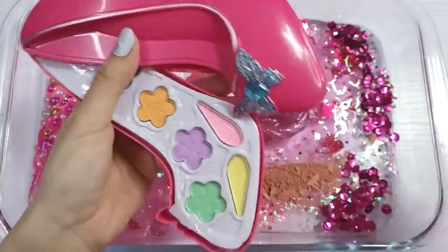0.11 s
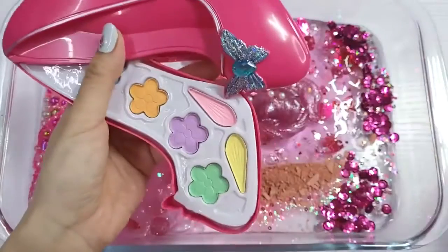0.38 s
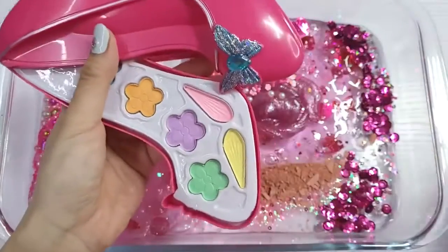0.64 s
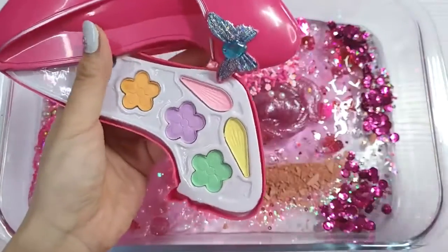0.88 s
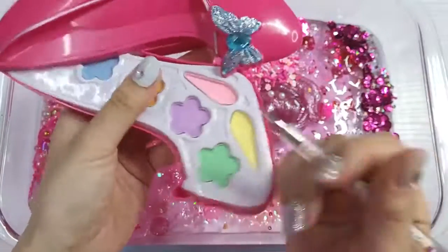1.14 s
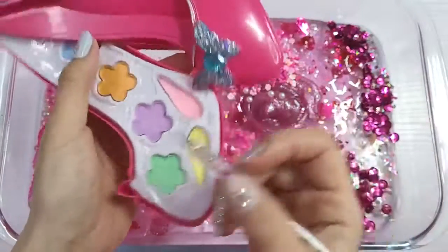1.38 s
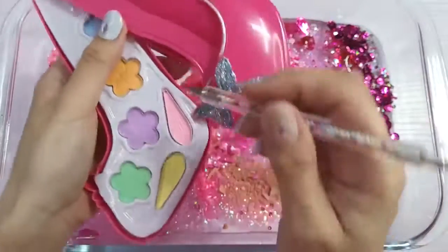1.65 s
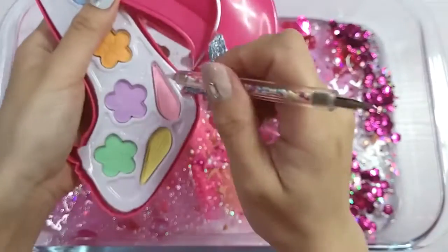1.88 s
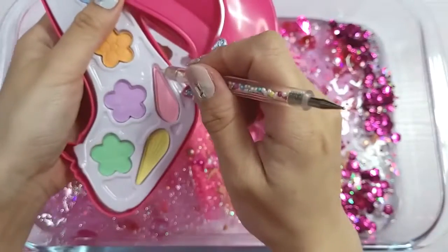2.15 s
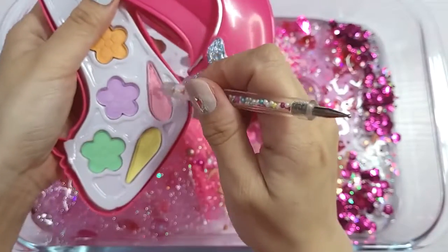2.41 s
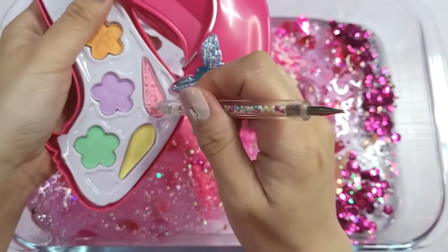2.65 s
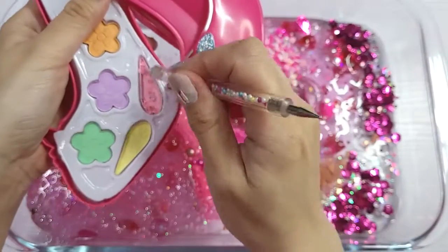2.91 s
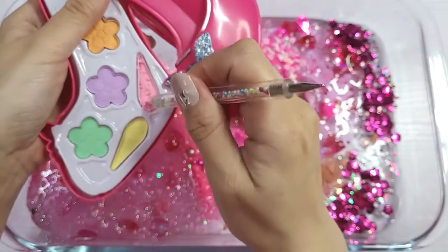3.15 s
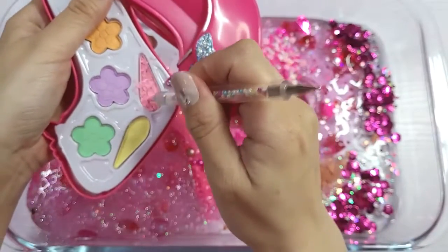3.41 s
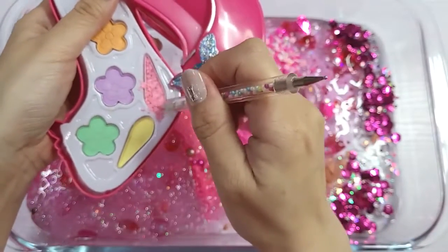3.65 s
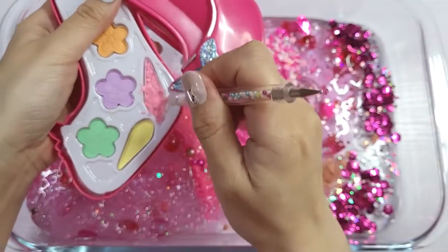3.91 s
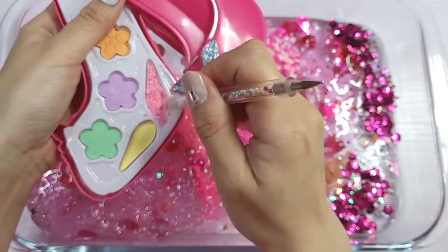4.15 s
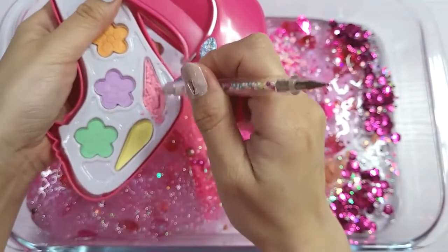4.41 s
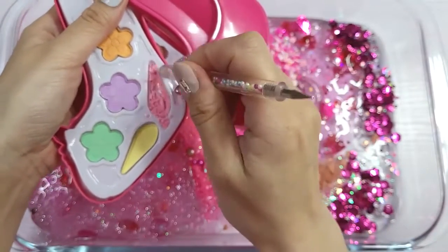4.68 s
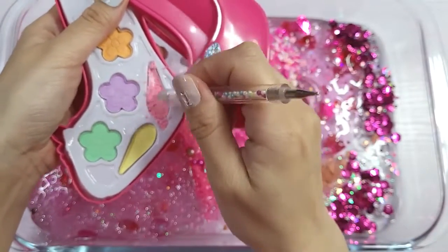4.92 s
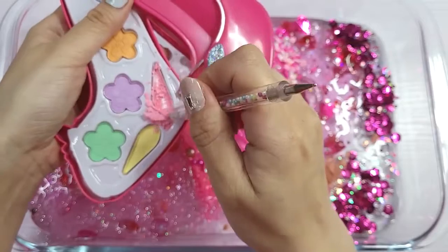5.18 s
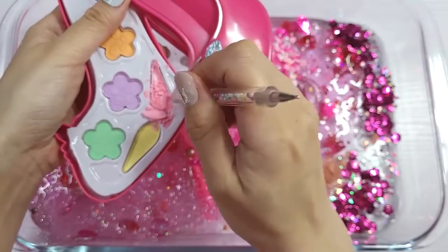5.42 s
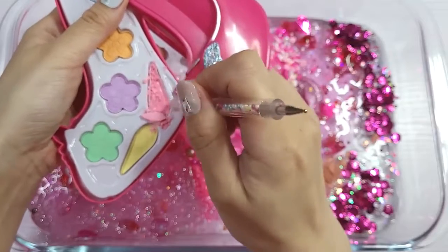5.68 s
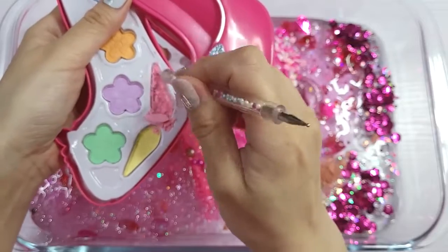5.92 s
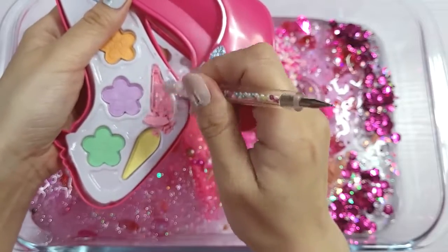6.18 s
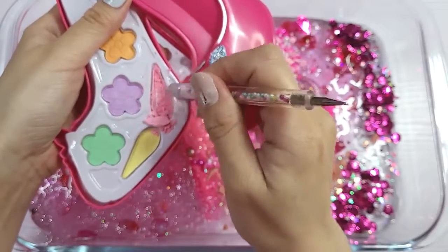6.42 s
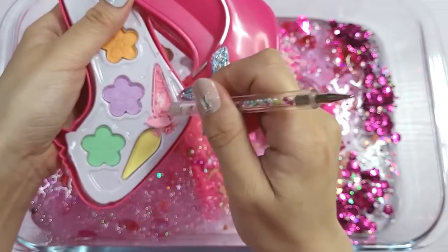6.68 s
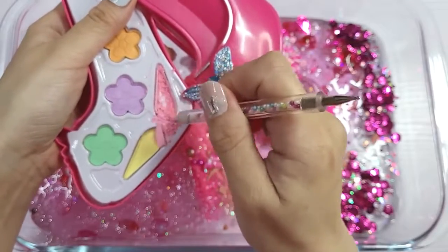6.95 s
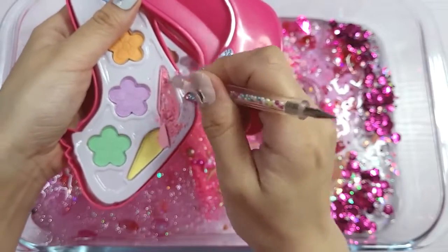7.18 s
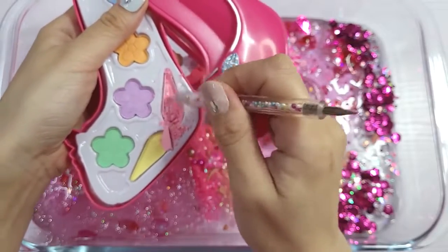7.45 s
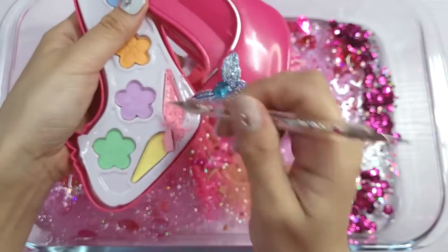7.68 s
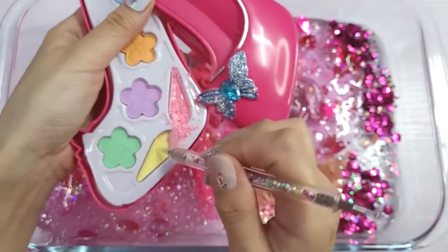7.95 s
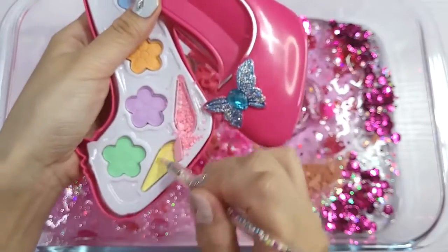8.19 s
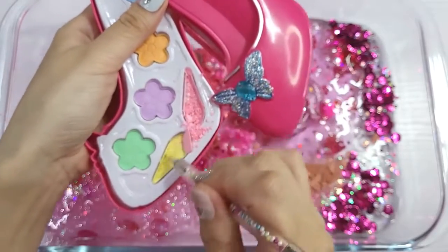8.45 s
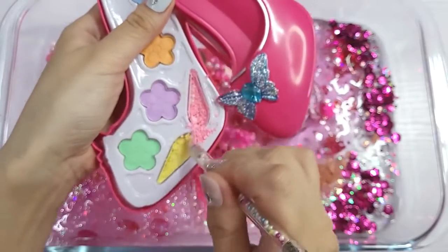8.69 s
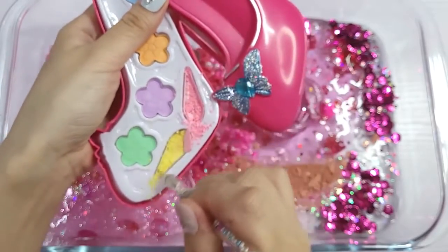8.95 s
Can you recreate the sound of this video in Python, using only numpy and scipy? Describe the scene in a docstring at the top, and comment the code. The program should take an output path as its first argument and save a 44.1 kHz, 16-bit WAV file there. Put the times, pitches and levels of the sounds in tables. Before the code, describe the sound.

Close crisp scraping and snapping on a thin plastic makeup palette, short uneven strokes with a few loud cracks over faint room hiss

```python
"""Scraping pressed powder from a plastic tray

A steel pick scrapes a hand-held tray, close to a stereo microphone, in a small room with quiet hum and hiss.
The tip sticks and slips: dense random slips and single snaps push the decaying modes of the hollow shell.
Breaking powder grains add puffs of treble noise; a faint wavering tone squeaks and soft noise bumps knock.
Random-sign echoes of the tray follow from the room."""
import sys
import numpy as np
from scipy import signal
from scipy.fft import rfft, irfft
from scipy.io import wavfile
from scipy.ndimage import uniform_filter1d

SR = 44100
rng = np.random.default_rng(int(sys.argv[2]) if len(sys.argv) > 2 else 0)


def store_wav(level_fs):
    """Save 16-bit WAV to argv[1]."""
    pcm = np.round(np.clip(np.atleast_2d(level_fs), -1, 1) * 32767)
    wavfile.write(sys.argv[1], SR, pcm.T.astype(np.int16))


def boost(x):
    """Linear amplitude factor 10**(x/20) for a level x in decibels (scalar or array-like)."""
    u = np.asarray(x, float) / 20
    return 10 ** u


N = 400428  # samples


def evened(x):
    """Scales to rms 1."""
    return x / np.sqrt(np.mean(x ** 2) + 1e-20)


def read_spectrum(points, hz):
    """Looks a spectrum up on a log-frequency axis."""
    f, value = np.transpose(points)
    return np.interp(np.log(hz + 1), np.log(f + 1), value)


def wander(samples):
    """Slow chance of rms 1: noise smoothed twice over this many samples."""
    width = max(int(samples), 2)
    smooth = uniform_filter1d(rng.standard_normal(N), width)
    return evened(uniform_filter1d(smooth, width))


# colour of room tone and capsule hiss, relative: pitch_hz, level_db (per Hz)
AIR_COLOUR = [(25, -3.5), (64, -8.5), (190, -10.5), (520, -6.5), (850, -14.5), (1400, -20.5), (2500, -23),
              (5300, -28.5), (7000, -33), (13000, -34.5), (16000, -45)]
# how alike the two capsules hear the room tone: pitch_hz, likeness (-1 to 1)
AIR_LIKENESS = [(40, 1), (100, -0.017), (300, 0.56), (1000, -0.31), (15000, 0.098)]


def air():
    """Room tone and capsule hiss, alike left and right mainly in the bass, with a wavering hum."""
    hiss_db, hum_hz, hum_db = -70.5, 52, -76.5  # centres; the hum wavers around its two
    frames, hz = N // 512 + 5, np.fft.rfftfreq(2048, 1 / SR)
    a, b, c, d = rng.standard_normal((frames, 1025, 4)).T
    same = np.clip(read_spectrum(AIR_LIKENESS, hz), -1, 1)[:, None]
    left = a + 1j * b
    right = same * left + np.sqrt(1 - same ** 2) * (c + 1j * d)
    bins = np.array([left, right]) * boost(read_spectrum(AIR_COLOUR, hz))[:, None]
    # the room tone drifts in patches of time and pitch
    patches = uniform_filter1d(rng.standard_normal((frames, 1025)).T, 30, 0)
    patches = uniform_filter1d(patches, 8, 1)
    bins *= boost(2.2 * evened(patches))
    noise = signal.istft(bins, nperseg=2048, noverlap=1536)[1][:, :N]
    hiss = boost(hiss_db) * evened(noise)
    hum_level = boost(hum_db + 3.0 * wander(4000))
    hum_turns = np.cumsum(hum_hz + 3.5 * wander(5000)) / SR
    hum = hum_level * np.sin(2 * np.pi * hum_turns)
    return (hiss + hum) * boost([[-1.1], [1.1]])  # a little louder at the right capsule


# strokes of the pick: start_s, end_s, boom_start_db, boom_end_db, ring_above_boom_db
STROKES = [(0.006, 0.084, -62.5, -45, -9), (1.204, 1.303, -52.5, -46, -6.5),
           (1.423, 1.496, -74.5, -42, -8.5), (1.515, 1.537, -46.5, -63, -13),
           (1.878, 1.911, -59, -41.5, -11), (2.06, 2.124, -64, -53, -8), (2.174, 2.197, -47, -64, -18),
           (2.329, 2.384, -47.5, -57, -7), (2.383, 2.62, -53.5, -48.5, -4.5),
           (2.776, 2.917, -61.5, -34, -4), (3.009, 3.098, -43.5, -40, -1.5), (3.114, 3.23, -65, -73, -10),
           (3.224, 3.367, -70.5, -34.5, -1.5), (3.431, 3.552, -44, -55.5, 0),
           (3.591, 3.652, -64.5, -46, -8.5), (3.68, 3.7, -71, -54.5, -1.5), (3.769, 3.908, -59, -48, -5),
           (3.986, 4.02, -39, -60, -4.5), (4.087, 4.143, -46.5, -32, 0.5), (4.218, 4.262, -42.5, -72, 4.5),
           (4.304, 4.333, -48, -46, 0), (4.398, 4.443, -43.5, -60, -2.5), (4.476, 4.544, -50, -37.5, -3),
           (4.58, 4.685, -46.5, -64, -1), (4.681, 4.752, -35.5, -50.5, -0.5), (4.775, 4.798, -46, -57, -15),
           (4.858, 4.957, -53.5, -48, -5.5), (4.926, 5.088, -60.5, -47.5, -3),
           (5.067, 5.184, -64, -44.5, -3), (5.296, 5.377, -55, -55, -5), (5.38, 5.473, -65.5, -42.5, -8.5),
           (5.489, 5.606, -54, -35.5, -6.5), (5.662, 5.736, -51, -33, -5), (5.803, 5.931, -45, -41.5, -3.5),
           (6.016, 6.167, -49, -40.5, -4.5), (6.238, 6.299, -44.5, -54.5, -5),
           (6.337, 6.415, -41.5, -65, -1.5), (6.449, 6.496, -39.5, -40.5, -1.5),
           (6.52, 6.608, -49.5, -60, -8), (6.607, 6.657, -57, -39.5, 6), (6.697, 6.747, -45, -47.5, 2),
           (6.794, 6.813, -46, -47, 6), (6.858, 6.897, -42.5, -55, 3), (6.899, 6.923, -49, -34.5, -5),
           (6.943, 7.074, -75.5, -65, -1), (7.049, 7.133, -51.5, -53.5, -2.5),
           (7.138, 7.209, -51.5, -59, -6.5), (7.217, 7.367, -38, -70.5, -1), (7.397, 7.625, -60, -44, -5),
           (7.695, 7.762, -52.5, -76, -7.5), (8.056, 8.12, -61.5, -51, -12.5),
           (8.228, 8.323, -50, -64, 0.5), (8.247, 8.496, -49.5, -57.5, -8.5), (8.445, 8.532, -73.5, -38, 1),
           (8.557, 8.628, -52.5, -53.5, -12), (8.623, 8.667, -41, -66.5, -9),
           (8.746, 8.874, -59, -38, -4.5), (8.877, 8.945, -39.5, -40.5, -3), (9.02, 9.106, -43, -67.5, 0.5)]
# fizz of the strokes: time_s, fizz_above_boom_db
STROKE_FIZZ = [(.05, -14.5), (1.5, -11), (2.15, -23), (2.4, -15.5), (3.05, -10.5), (3.299, -16),
               (3.501, -17), (3.85, -18), (4.1, -14.5), (4.4, -18.5), (5.0, -16.5), (5.3, -13), (5.6, -22),
               (6.269, -12.5), (6.8, -16.5), (7.5, -15.5), (8.1, -22.5), (8.5, -13.5), (8.6, -19),
               (8.8, -13.5), (9.05, -13)]
# start of the skid after a snap, one row each for boom, ring, fizz: relative to the snap's level_db
SKID_DB = [
    [-18.5],
    [-36.5],
    [-12],
]


def stroke_gain():
    """Strokes arch from start to end and fade steeply as the tip lands and lifts; snaps leave a short skid."""
    rise_db, fall_db, land_db_per_s, lift_db_per_s = 3.5, 18.5, 1403.5, 600
    skid_t60_s, rest_db = 0.038, -21.5
    t, out = np.arange(N) / SR, np.zeros((3, N))  # rows: boom, ring, fizz
    for start, end, start_db, end_db, ring_db in STROKES:
        near = slice(max(round((start - .06) * SR), 0), round((end + .1) * SR))
        u = np.clip((t[near] - start) / (end - start), 0, 1)
        arch_db = np.where(u < .5, rise_db, fall_db) * (2 * u - 1) ** 4
        db = start_db + (end_db - start_db) * u - arch_db
        db -= land_db_per_s * np.maximum(start - t[near], 0)
        db -= lift_db_per_s * np.maximum(t[near] - end, 0)
        fizz_db = np.interp((start + end) / 2, *np.transpose(STROKE_FIZZ))
        levels = boost(db + np.array([[0], [ring_db], [fizz_db]]))
        out[:, near] = np.maximum(out[:, near], levels)
    for s, boom_db, ring_db, fizz_db in SNAPS:
        near = slice(round(s * SR), round(s * SR) + SR // 10)
        peak_db = np.array([[boom_db], [ring_db], [fizz_db]])
        skid = boost(peak_db + SKID_DB - 60 * (t[near] - s) / skid_t60_s)
        out[:, near] = np.maximum(out[:, near], skid)
    # the tip keeps rubbing faintly between strokes, lagging a little
    rest = uniform_filter1d(uniform_filter1d(out, 2500), 2500, origin=1000)
    return out + boost(rest_db) * rest


def noise_gain(modes):
    """Rms with which a set of modes answers unrelated pushes of rms 1."""
    hz, db, t60 = np.transpose(modes)
    return np.sqrt(np.sum(boost(2 * db) * t60 * SR / (4 * np.log(1000))))


def scrape():
    """Random tiny slips in clumps; the moving tip favours now one mode, now another."""
    slips_per_s = 1700  # on average
    clumps = boost(1.72 * wander(94) + 0.79 * wander(570))
    happens = rng.random(N) < slips_per_s / SR
    slips = happens * boost(4 * np.minimum(rng.exponential(1, N), 3.3))
    slips = evened(slips * rng.choice([-1., 1.], N) * clumps)
    boom, ring, hiss = stroke_gain()

    def touch():
        """The slips as one mode feels them, with its own favour and roughness."""
        favour = boost(3.2 * wander(1000))
        return slips * evened(favour * (2 + rng.standard_normal(N)))

    # light slips hardly move the air inside
    pushes = [boost(-3.5) * boom * touch() / noise_gain(BOOM) for _ in HOLLOW]
    pushes += [boom * touch() / noise_gain(BOOM) for _ in BOOM]
    pushes += [ring * touch() / noise_gain(RING) for _ in RING]
    grains = evened(slips + 4.5 * evened(clumps) * rng.standard_normal(N))
    return np.array(pushes + [hiss * grains])


# air inside the shell: pitch_hz, level_db, t60_s
HOLLOW = [(411, -16.5, 0.034), (545, -20.5, 0.029), (653, -15, 0.021)]
# lower modes of the plastic shell: pitch_hz, level_db, t60_s
BOOM = [(1190, 1.5, 0.0081), (1403.4, 5.5, 0.011), (1767, 5, 0.01), (2158, -0.5, 0.0099)]
# higher modes of the plastic shell: pitch_hz, level_db, t60_s
RING = [(2432, 7, 0.013), (2735, 7, 0.012), (3045, 5.5, 0.014), (3754, 4.5, 0.013), (4185, -6.5, 0.014),
        (4786, -6.5, 0.012), (5650, -16.5, 0.012), (3150, 13.5, 0.0047)]
# the shell is louder at left in low and middle pitches, at right in the treble: pitch_hz, left_above_right_db
LEFT = [(450, 5.5), (1300, 3), (3000, 4), (6000, -7)]


def shell(modes, pushes, edge_hz, spread):
    """Modes ring on their own pushes, drift as the grip changes, and reach each capsule in their own phase."""
    rise_cycles = 0.47  # sets how slowly a mode swings up, in its own cycles
    out, side = np.zeros((2, N)), np.array([[1], [-1]])
    for (hz, db, t60), push in zip(modes, pushes):
        drifting_hz = hz * (1 + .025 * wander(2500))
        turn = np.exp(2j * np.pi * np.cumsum(drifting_hz) / SR)
        decay = boost(-60 / (t60 * SR))
        soft = np.exp(-hz / (rise_cycles * SR))
        # rises, then dies
        swing = turn * signal.lfilter([1 - soft], np.convolve([1, -decay], [1, -soft]), push / turn)
        level = boost(db + read_spectrum(LEFT, hz) / 2 * side)
        phase = np.exp(1j * spread * side * wander(4400))  # spread in radians rms
        out += level * (swing * phase).imag
    radiates = signal.butter(5, [edge_hz, 7000], "band", fs=SR, output="sos")
    return signal.sosfilt(radiates, out)


# grains of powder breaking at the tip: pitch_hz, level_db (per Hz)
FIZZ_COLOUR = [(1800, -40.5), (4600, -3.5), (6600, -7), (9000, -12), (11500, -19.5), (13300, -16.5),
               (15600, -23), (16400, -41)]


def fizz(push):
    """Short treble puffs, unlike at the capsules; five random ones of one overall colour trade places by chance."""
    t, out = np.arange(512) / SR, np.zeros((2, N))
    colour = boost(read_spectrum(FIZZ_COLOUR, np.fft.rfftfreq(1024, 1 / SR)))
    envelope = boost(-60 * t / .008) * np.minimum(t / .0013, 1)
    shares = np.array([boost(7.0 * wander(1500)) for _ in range(5)])
    for share in shares / np.linalg.norm(shares, axis=0):
        bins = rfft(rng.standard_normal((2, 512)) * envelope, 1024)
        unevenness = np.sqrt(uniform_filter1d(abs(bins) ** 2, size=8))
        puff = irfft(bins * colour / unevenness)
        puff = puff[0] + np.array([[1.1], [-1.1]]) * puff[1]  # one part alike at both capsules, one opposed
        puff *= boost([[.3], [-.3]]) / np.linalg.norm(puff, axis=1, keepdims=True)
        out += signal.oaconvolve((share * push)[None], puff, axes=1)[:, :N]
    return out


# how fast the room's echoes die: pitch_hz, t60_s
WALLS = [(500, 0.22), (2000, 0.14), (6000, 0.15), (14000, 0.13)]


def room(x):
    """Sparse echoes of random sign from tray, table and walls, each band dying at its own speed."""
    taps = np.zeros((2, SR // 2))
    at = np.arange(60, SR // 2 - 20, 20) + rng.integers(0, 20, (2, (SR // 2 - 61) // 20))
    np.put_along_axis(taps, at, rng.choice([-1., 1.], at.shape), 1)
    hz, t, bins = signal.stft(taps, SR, nperseg=128)
    decay = boost(-60 * t / read_spectrum(WALLS, hz)[:, None])
    tail = signal.istft(bins * decay, SR, nperseg=128)[1]
    return signal.fftconvolve(x, tail / np.linalg.norm(tail[0]), axes=1)[:, :N]


# single snaps, nominal peaks: start_s, boom_db, ring_db, fizz_db
SNAPS = [(0.052, -31, -27.5, -35.5), (0.5856, -85, -78, -65.5), (.683, -70, -64, -63.5),
         (0.863, -45, -46.5, -56.5), (1.004, -49.5, -68, -71.5), (1.173, -71, -74.5, -61.5),
         (1.2082, -38.5, -47.5, -52), (1.232, -41, -44.5, -56), (1.2748, -36, -39.5, -46.5),
         (1.37, -59.5, -66.5, -89), (1.407, -54.5, -66, -63.5), (1.452, -41.5, -48.5, -84),
         (1.479, -42.5, -47.5, -60), (1.637, -60, -63.5, -70), (1.6595, -39, -39.5, -51),
         (1.844, -42, -39, -60), (1.856, -38.5, -33.5, -44.5), (1.8876, -40.5, -40, -57),
         (1.903, -37.5, -36, -55), (2.008, -39, -39, -48.5), (2.0403, -40, -45, -64),
         (2.0755, -37, -38.5, -51), (2.0926, -39, -42.5, -66), (2.101, -35.5, -39, -61),
         (2.2389, -48, -48, -56), (2.3081, -33, -34, -59), (2.322, -38, -40, -60),
         (2.3296, -38.5, -47.5, -57), (2.399, -43, -39, -52), (2.409, -32, -29, -38.5),
         (2.452, -42.5, -54.5, -55), (2.4715, -36, -31.5, -51), (2.488, -37.5, -49, -57),
         (2.5803, -35.5, -29, -56), (2.7713, -51.5, -49.5, -75), (2.7933, -32, -31, -54.5),
         (2.8613, -33, -27, -69), (2.88, -34.5, -38, -48.5), (3.003, -36.5, -29.5, -54),
         (3.029, -40.5, -37, -64), (3.218, -46, -51, -53), (3.2678, -32, -32.5, -49),
         (3.3283, -32.5, -38.5, -72), (3.4569, -13, -2, -31), (3.497, -27.5, -28.5, -63),
         (3.5129, -20, -24.5, -43), (3.8102, -38, -35, -55.5), (3.9818, -31.5, -32, -60),
         (3.999, -34, -42, -64), (4.03, -13.5, -13.5, -40), (4.032, -59, -6.5, -30),
         (4.0937, -19.5, -12.5, -35.5), (4.1159, -21.5, -31, -41.5), (4.415, -63, -28, -79),
         (4.511, -27, -50.5, -57), (4.597, -12.5, -1.5, -38.5), (4.6866, -23.5, -27, -63),
         (4.9122, -42, -43, -79), (4.95, -46, -47, -72.5), (5.0444, -42.5, -42, -78),
         (5.1227, -44.5, -46, -59.5), (5.1548, -39.5, -43.5, -69), (5.296, -42.5, -41, -40),
         (5.5496, -29.5, -24, -47), (5.5691, -39, -26.5, -57), (5.581, -36.5, -34, -57),
         (5.593, -48, -27.5, -67), (5.707, -23.5, -24.5, -43), (6.159, -29.5, -20, -47),
         (6.4721, -18, -19.5, -58), (6.527, -11.5, -2, -38.5), (6.551, -36, -30.5, -62),
         (6.568, -35.5, -35, -61), (6.646, -31, -33.5, -68), (6.654, -31.5, -41.5, -70),
         (6.7046, -33.5, -43.5, -79), (6.81, -34.5, -36, -70), (6.8616, -41.5, -50.5, -77),
         (6.914, -27.5, -21.5, -49.5), (7.0873, -40.5, -49, -58), (7.186, -43.5, -35, -74),
         (7.217, -30, -28, -53), (7.2343, -50, -24.5, -73), (7.2835, -55, -35, -50),
         (7.492, -40.5, -46, -81), (7.5057, -43.5, -48, -72), (7.5815, -35.5, -49.5, -71),
         (7.628, -53, -50.5, -75), (7.707, -48.5, -48.5, -70), (7.78, -36, -38.5, -44.5),
         (8.0578, -45.5, -57.5, -84), (8.091, -43.5, -56.5, -84), (8.116, -47.5, -54.5, -81),
         (8.2253, -32, -30, -65), (8.2436, -32.5, -35.5, -60.5), (8.258, -41, -40, -55),
         (8.267, -36, -54, -56), (8.356, -24.5, -24, -40.5), (8.388, -30, -31.5, -48),
         (8.4144, -30, -27, -49.5), (8.475, -40, -55, -63), (8.5231, -28, -28, -41),
         (8.5612, -41, -46.5, -69), (8.6258, -42.5, -33.5, -57), (8.6393, -39, -30.5, -61),
         (8.7048, -41, -48, -66), (8.7368, -48, -42.5, -87), (8.762, -31.5, -25, -50),
         (8.7803, -44, -26, -40), (8.8032, -29, -24, -41.5), (8.816, -30, -27, -56),
         (8.8385, -24, -14, -34.5), (8.8446, -32, -33, -58), (8.8576, -43.5, -38, -52),
         (8.876, -28.5, -31.5, -38.5), (8.92, -30, -28.5, -58), (8.9356, -34, -42, -52),
         (8.969, -45, -46.5, -60), (8.987, -54.5, -52, -69), (9.0284, -37, -36.5, -60),
         (9.0465, -36.5, -44, -66)]


def snaps():
    """Clusters of slips as the tip judders: hard snaps lead with their strongest slip, light ones begin softly."""
    s, boom_db, ring_db, fizz_db = np.transpose(SNAPS)
    # sharp snaps (ring above boom) and hard ones judder shorter
    judder_ms = 3.8 - 0.3 * (ring_db - boom_db) - 0.07 * (ring_db + 35)
    judder_ms = np.clip(judder_ms, 1, 12)
    after, sign = rng.random((len(s), 2, 7)).transpose(1, 0, 2)
    after = after * (np.arange(7) > 0)  # the first slip comes at once
    at_s = s[:, None] + after * judder_ms[:, None] / 1000
    at = np.clip(np.round(at_s * SR).astype(int), 0, N - 1)
    size = boost(-9 * after) * np.sign(sign - .5) * np.clip(judder_ms[:, None] / 6, 0, 1.2)
    size[:, 0] = np.clip(3.0 / judder_ms, 0, 1)  # light touches begin softly
    # each snap lands on another spot of the shell
    spot_db = 2.3 * rng.standard_normal((len(s), len(HOLLOW + BOOM + RING) + 1))
    # the modes of a set share the peak; a puff spreads its energy over many samples
    level_db = [boom_db - 5.5] * len(HOLLOW + BOOM) + [ring_db - 17.5] * len(RING) + [fizz_db + 21.0]
    pushes = []
    for db, spot in zip(level_db, spot_db.T):
        slips = size * boost(db + spot)[:, None]
        pushes.append(np.bincount(at.ravel(), slips.ravel(), N))
    return np.array(pushes)


# soft bumps, mostly low, two of them higher pips: start_s, level_db, pitch_hz
BUMPS = [(.41, -59.5, 530), (0.643, -66, 190), (2.716, -71, 1740), (3.452, -51, 185), (3.49, -40.5, 560),
         (8.872, -50.5, 620), (8.89, -61, 190), (5.17, -61.5, 700), (1.12, -69, 1800)]


def bumps():
    """Soft knocks of the hand, mostly dull: a puff of noise around one pitch."""
    out, t = np.zeros(N), np.arange(4000) / SR
    swell = np.e * t / .006 * np.exp(-t / .006)  # peaks at 1 after 6 ms
    for s, db, hz in BUMPS:
        band = signal.butter(2, [hz / 1.37, 1.26 * hz], "band", fs=SR, output="sos")
        puff = evened(signal.sosfilt(band, rng.standard_normal(4000)))
        out[round(s * SR):][:4000] += boost(db) * swell * puff
    return out


# a faint squeak, before its flicker and waver: time_s, pitch_hz, level_db
SQUEAK = [(0.489, 9100, -100), (0.589, 8960, -66), (0.628, 9200, -100), (0.658, 9200, -70.5),
          (0.712, 8780, -74), (.74, 8800, -100)]


def squeak():
    """A thin whistle: one sine whose pitch wavers and whose level flickers."""
    s, hz, db = np.transpose(SQUEAK)
    t = np.arange(N) / SR
    turns = np.cumsum(np.interp(t, s, hz) + 70 * wander(60)) / SR
    level = boost(np.interp(t, s, db, -140, -140) + 6.0 * wander(420))
    return np.sqrt(2) * level * np.sin(2 * np.pi * turns)


def scene():
    """Tray in the hand, its echoes, and the room tone."""
    echo_db = -15
    *pushes, grains = scrape() + snaps()
    tray = shell(HOLLOW, pushes, edge_hz=480, spread=0.8)
    tray += shell(BOOM + RING, pushes[len(HOLLOW):], edge_hz=1216, spread=0.37)
    tray += fizz(grains) + squeak() + bumps()
    return tray + boost(echo_db) * room(tray) + air()


def roll_off(x):
    """The treble ends steeply here."""
    return signal.sosfilt(signal.butter(12, 16790, fs=SR, output="sos"), x)


def record(dry):
    """The converter behind the stereo microphone clips at full scale."""
    mix = np.clip(dry, -1, 1)
    return roll_off(mix)


dry = scene()
out = record(dry)
store_wav(out)
```